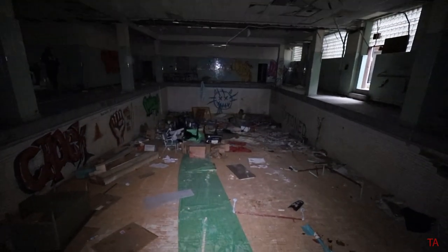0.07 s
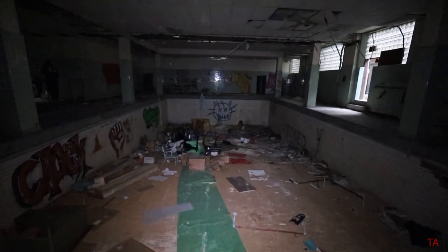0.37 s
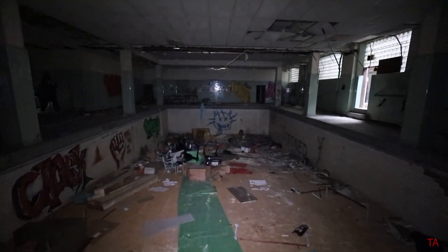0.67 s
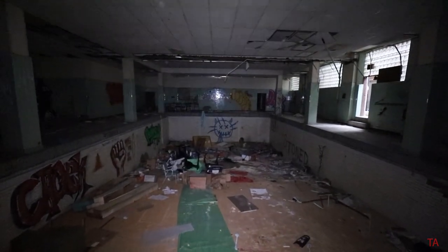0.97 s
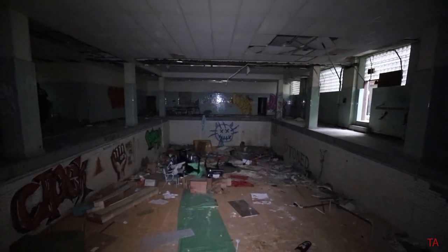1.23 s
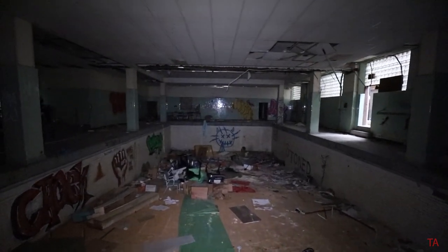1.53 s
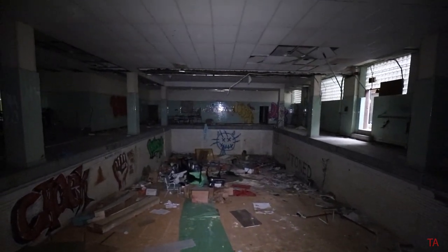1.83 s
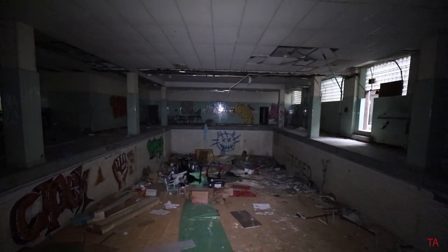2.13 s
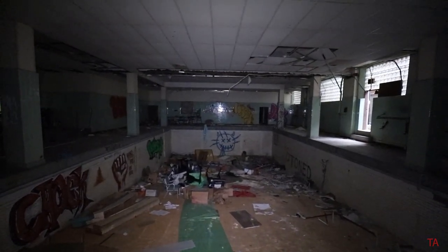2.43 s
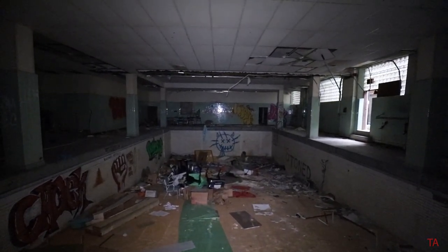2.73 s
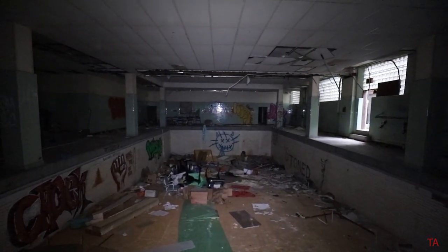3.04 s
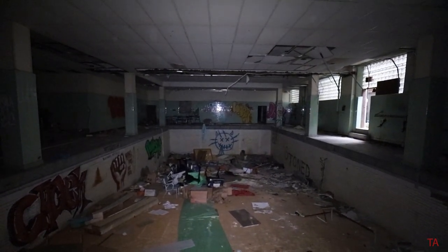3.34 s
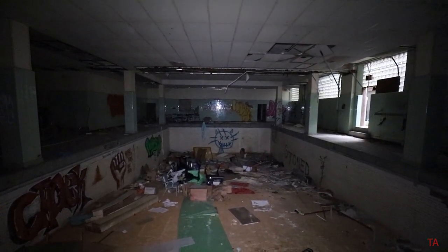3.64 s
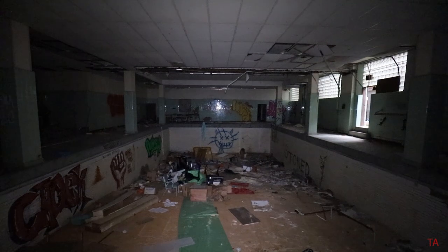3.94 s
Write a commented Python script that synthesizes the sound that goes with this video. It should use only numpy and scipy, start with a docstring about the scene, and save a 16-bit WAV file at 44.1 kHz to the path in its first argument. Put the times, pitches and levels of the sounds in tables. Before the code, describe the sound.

Slow footsteps thump and scuff over a gritty floor in a large derelict hall. A clap's echo fades first; the steps follow close by, then hollow knocks clatter further off, all over a faint rumble and hiss.

```python
"""A drained indoor swimming pool in a derelict, tiled hall, with a low rumble and a thin hiss throughout.
A loud clap, struck just before the start, rings away as reverberation. After a soft, low bump, someone
steps slowly over the gritty floor: heels thump by impact, soles scuff by friction, grit cracks and
clothes rustle faintly. Something hollow knocks further off, once weakly midway, then in a quick cluster
near the end. Steps and knocks echo in the hall, whose treble dies first."""
import sys
import numpy as np
from scipy import signal
from scipy.fft import rfft, irfft, next_fast_len
from scipy.io import wavfile

SR = 44100
rng = np.random.default_rng(int(sys.argv[2]) if len(sys.argv) > 2 else 0)


def master_out(mix):
    """Clip the mix to full scale and print it as 16-bit PCM to the path in sys.argv[1]."""
    frames = np.transpose(np.atleast_2d(mix))
    ceiling = np.clip(frames, -1, 1)
    pcm = np.round(ceiling * 32767).astype(np.int16)
    wavfile.write(sys.argv[1], SR, pcm)


N = 176400
LEAD_S = 1 / 6  # the time line begins this early, to hold the clap

# spectrum of the still air: freq_hz, relative_db
AIR_SPECTRUM = [(12, -3.5), (27, -3.5), (40, -10), (60, -18.5), (100, -17), (200, -22.5), (500, -24),
                (1000, -32), (2000, -31.5), (4000, -37), (8000, -38.5), (15500, -42)]
# reverberation time of the hall: freq_hz, t60_s
REVERB_TIMES = [(100, 1), (300, 1.87), (700, 1.77), (1400, 1.6351), (2000, 1.6), (2800, 1.43),
                (4000, 1.3452), (5500, 1.14), (8000, 0.7), (14000, 0.6)]
# single hard reflections: delay_s, gain_db
REFLECTIONS = [(0.019, -11), (0.117, -23), (.153, -26)]
# swishes of clothing: start_s, length_s, level_db
CLOTH_RUSTLES = [(0.883, .04, -54), (1.889, 0.075, -60.5), (2.012, 0.085, -59.5), (3.09, 0.045, -61.5),
                 (3.452, 0.065, -62)]
# small dry clicks nearby: start_s, level_db, pitch_hz
NEAR_CLICKS = [(.7996, -28, 7500), (.976, -35, 12500), (1.0058, -31, 12000), (1.009, -19.5, 11900),
               (1.7325, -32, 11100)]
# grit cracking underfoot: start_s, level_db, pitch_hz
GRIT_TICKS = [(.9637, -40, 4500), (1.466, -39, 4500), (1.6756, -27, 4740), (1.7325, -20, 5440),
              (1.7705, -22.5, 4840), (1.819, -27, 5200), (2.4449, -18.5, 5900), (2.4642, -21, 9000),
              (2.476, -16, 12000), (2.503, -11, 4600), (2.512, -15.5, 7500)]
# knocks further off: start_s, level_db
FAR_KNOCKS = [(2.026, -25), (3.30, -13), (3.329, -12), (3.376, -13.5), (3.3866, -3.5), (3.402, -13.5),
              (3.413, -7.5), (3.420, -10.5)]
# resonance of the hollow object: freq_hz, relative_db
KNOCK_SPECTRUM = [(150, -14), (400, -15), (750, -9), (1200, 0.5), (1700, 2), (2100, -8.5), (2800, -18),
                  (4500, -31), (8000, -52), (15000, -52)]
# soles dragging: start_s, attack_s, hold_s, release_s, level_db, tilt_db_per_octave
SOLE_SCUFFS = [(0.771, 0.058, .06, .03, -59.5, 1), (0.886, 0.076, 0.092, 0.043, -50.5, 0),
               (1.392, 0.054, 0.18, 0.054, -58.5, -1.5), (1.57, 0.052, 0.1, 0.032, -54.5, 0.1),
               (1.72, 0.026, 0.071, 0.073, -54.5, -0.5), (2.113, .02, 0.03, 0.023, -54, -0.5),
               (2.436, 0.046, 0.049, 0.031, -41.5, 0.5), (2.848, 0.023, 0.056, .06, -64, 0),
               (3.202, 0.022, 0.028, 0.066, -44.5, -1.8)]
# spectrum of sliding on grit: freq_hz, relative_db
SCUFF_SPECTRUM = [(150, -7), (400, -8), (800, -1), (1800, -2.5), (2800, -2.5), (4300, -2), (6200, -2),
                  (8500, -6), (12000, -15), (15500, -21)]
# the sole slapping down after the heel: start_s, level_db, decay_s
SOLE_SLAPS = [(2.472, -7.5, 0.031), (2.502, -8.5, 0.036)]
# spectrum of a slap: freq_hz, relative_db
SLAP_SPECTRUM = [(100, -3), (300, 5), (700, 7.5), (1200, 9.5), (1900, 7.5), (2800, -2.5), (4500, -15),
                 (8000, -2), (15000, -26)]
# heels striking the floor: start_s, level_db, decay_s
HEEL_THUMPS = [(.90, -24.5, 0.056), (1.570, -18, 0.074), (2.417, -3, 0.047), (3.205, -24.5, .02)]
# spectrum of a thump: freq_hz, relative_db
HEEL_SPECTRUM = [(50, -38), (110, -10), (220, -4.5), (330, -2.5), (450, -1.5), (600, -3.5), (850, -12),
                 (1200, -14), (2000, -30), (5000, -27), (15000, -48)]
# spectrum of the clap: freq_hz, relative_db
CLAP_SPECTRUM = [(120, -40), (250, -25.5), (450, -19.5), (800, -10), (1200, -5.5), (1650, 2), (2150, -1),
                 (2800, -10), (3800, -12), (5500, -19), (7700, -28), (9300, -28.5), (11500, -44),
                 (15500, -59)]


def undb(db):
    """Amplitude ratio of a level in decibels."""
    return 10 ** (np.asarray(db) / 20)

def clock():
    """Time in seconds, negative during the lead-in."""
    return np.arange(-int(LEAD_S * SR), N) / SR

def unit(x):
    """Normalisation to an rms of 1."""
    return x / np.sqrt(np.mean(x ** 2))

def energy(x, db):
    """Normalisation to a total energy in decibels."""
    return x * undb(db) / np.linalg.norm(x)

def place(sounds):
    """Superposition of (start_s, sound) pairs on the time line."""
    out = np.zeros(len(clock()))
    for start_s, x in sounds:
        i = max(int((start_s + LEAD_S) * SR), 0)
        out[i:i + len(x)] += x[:len(out) - i]
    return out

def ring(spectrum, tilt_db=0):
    """Minimum-phase impulse response of unit energy for a spectrum, tilted by tilt_db per octave."""
    size = 4096
    hz = np.arange(size // 2 + 1) * SR / size
    points_hz, points_db = np.array(spectrum).T
    db = np.interp(np.log(hz + 1), np.log(points_hz), points_db)
    db += tilt_db * np.log2(np.maximum(hz, points_hz[0]))
    cepstrum = irfft(np.log(undb(db)))
    cepstrum[1:size // 2] *= 2  # folding onto positive time makes the response causal
    cepstrum[size // 2 + 1:] = 0
    return energy(irfft(np.exp(rfft(cepstrum))), 0)

def colour(x, spectrum, tilt_db=0):
    """Source and filter: convolution imposes a spectrum on an excitation."""
    return signal.fftconvolve(x, ring(spectrum, tilt_db))[:len(x)]

def band(x, hz, width_oct):
    """Band-pass filter, Gaussian in log frequency."""
    size = next_fast_len(len(x))
    bin_hz = np.arange(size // 2 + 1) * SR / size + 1
    bell = np.exp(-(np.log2(bin_hz / hz) / width_oct) ** 2 / 2)
    return irfft(rfft(x, size) * bell, size)[:len(x)]

def contact(decay_s):
    """A rough contact force: noise under an exponential decay."""
    age = np.arange(SR // 5) / SR
    return rng.standard_normal(len(age)) * np.exp(-age / decay_s)

def grains(count, per_s=5500, spread_db=1.5):
    """Shot noise: dense, independent tiny cracks of uneven size."""
    sizes = undb(spread_db * np.minimum(rng.exponential(size=count), 4))
    pulses = rng.standard_normal(count) * (rng.random(count) < per_s / SR)
    return unit(pulses * sizes)

def background():
    """Steady noise: the broadband hiss of still air over a deep, narrow-band rumble."""
    count = len(clock())
    air = colour(rng.standard_normal(count), AIR_SPECTRUM)
    rumble = unit(band(rng.standard_normal(count), hz=23, width_oct=0.18))
    return undb(-49) * air + undb(-50) * rumble

def hall(build_s=0.0071, ripple_db=0.47, ripples_per_s=150):
    """Reverberation: a diffuse tail decays exponentially in each band, with a few discrete echoes."""
    t = np.arange(2 ** 16) / SR
    spectrum = rfft(rng.standard_normal(len(t)))
    octave = np.log2(np.arange(len(spectrum)) * SR / len(t) + 1)
    centres = np.log2([hz for hz, _ in REVERB_TIMES])
    tail = 0
    for (_, t60_s), share in zip(REVERB_TIMES, np.eye(len(centres))):
        band_noise = irfft(spectrum * np.interp(octave, centres, share))
        tail += band_noise * np.exp(-np.log(1000) * t / t60_s)
    build_up = 1 - np.exp(-t / build_s)
    ripple = np.interp(t * ripples_per_s, np.arange(len(t)), rng.standard_normal(len(t)))
    response = energy(tail * build_up * undb(ripple_db * ripple), 0)
    for delay_s, db in REFLECTIONS:
        response[int(delay_s * SR)] += undb(db)
    return response

def bump(peak_s=0.583, width_s=0.01, pitch_hz=88):
    """A soft jolt: a Gaussian envelope confines a low tone to a few cycles."""
    t = clock()
    envelope = np.exp(-((t - peak_s) / width_s) ** 2)
    return undb(-44) * envelope * np.sin(2 * np.pi * pitch_hz * t)

def rustles():
    """Friction of cloth: a thin, high band of shot noise swells and fades."""
    t, sounds = np.arange(SR // 5) / SR, []
    for start_s, length_s, db in CLOTH_RUSTLES:
        swell = np.sin(np.pi * np.minimum(t / length_s, 1))
        swish = unit(band(grains(len(t)), hz=9500, width_oct=0.28))
        sounds.append((start_s, undb(db) * swell * swish))
    return place(sounds)

def cracks(rows, decay_s, width_oct):
    """Transients: each tiny snap is a brief burst with its energy in a band around its own pitch."""
    margin, sounds = 64, []  # samples of room for the filter to spread the burst
    for start_s, db, pitch_hz in rows:
        snap = band(np.pad(contact(decay_s), margin), pitch_hz, width_oct)
        sounds.append((start_s - margin / SR, energy(snap, db)))
    return place(sounds)

def knocks():
    """Impulse response: hard taps excite the resonance of something hollow, such as a loose board."""
    return place((start_s, undb(db) * ring(KNOCK_SPECTRUM)) for start_s, db in FAR_KNOCKS)

def scuffs():
    """Sliding friction: a sole drags over grit, and the grains swell, hold and fade with its pressure."""
    t, sounds = np.arange(SR // 2) / SR, []
    for start_s, attack_s, hold_s, release_s, db, tilt_db in SOLE_SCUFFS:
        release = np.exp(-np.maximum(t - attack_s - hold_s, 0) / release_s)
        pressure = np.minimum(t / attack_s, 1) * release
        scrape = colour(grains(len(t)) * pressure, SCUFF_SPECTRUM, tilt_db)
        sounds.append((start_s, undb(db) * scrape))
    return place(sounds)

def footfalls(rows, spectrum):
    """Impact: the short contact of heel or sole is filtered by the response of what is struck."""
    return place((start_s, energy(colour(contact(decay_s), spectrum), db))
                 for start_s, db, decay_s in rows)

def clap(start_s=-0.05, return_delay_s=0.105):
    """An impulse and its reflection: the far wall returns the sharp crack weaker and duller."""
    crack = ring(CLAP_SPECTRUM)
    reflection = undb(-4) * ring(CLAP_SPECTRUM, tilt_db=-2)
    return undb(20) * place([(start_s, crack), (start_s + return_delay_s, reflection)])

def scene():
    """Direct and reverberant fields add; the clap is heard only as reverberation, near sounds only dry."""
    grit = cracks(GRIT_TICKS, decay_s=0.0011, width_oct=0.48)
    heels = footfalls(HEEL_THUMPS, HEEL_SPECTRUM)
    slaps = footfalls(SOLE_SLAPS, SLAP_SPECTRUM)
    sources = [(heels, 2.5), (slaps, -3.5), (scuffs(), 1), (grit, 0), (knocks(), -3)]
    direct = sum(x * undb(direct_db) for x, direct_db in sources)
    excitation = clap() + sum(x for x, _ in sources)
    reverberant = signal.fftconvolve(excitation, hall())[:len(direct)]
    near = bump() + rustles() + cracks(NEAR_CLICKS, decay_s=0.00022, width_oct=0.38)
    return (direct + reverberant + near + background())[None, -N:]

def record(dry, cutoff_hz=15750):
    """Band limiting: a steep low-pass filter removes the highest treble."""
    return signal.sosfilt(signal.ellip(10, .2, 70, cutoff_hz, fs=SR, output="sos"), dry)


dry = scene()
out = record(dry)
master_out(out)
```